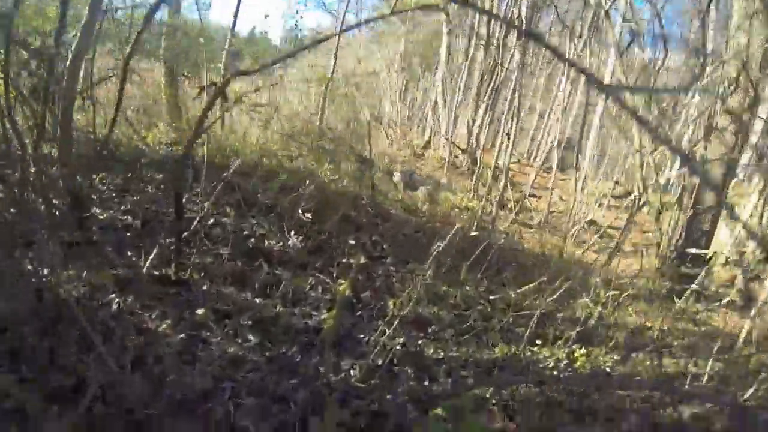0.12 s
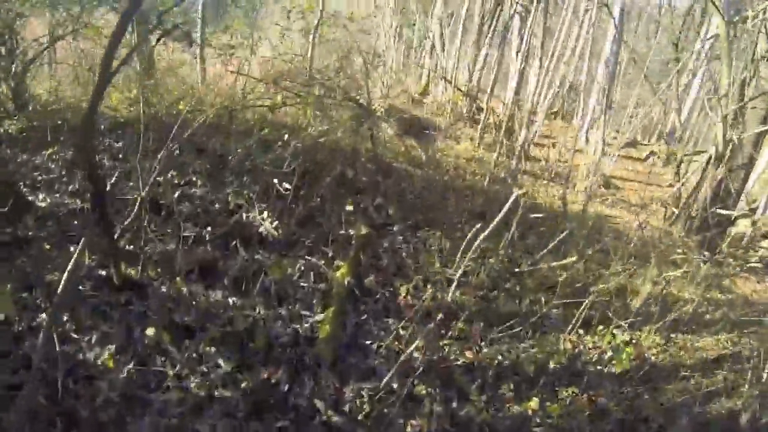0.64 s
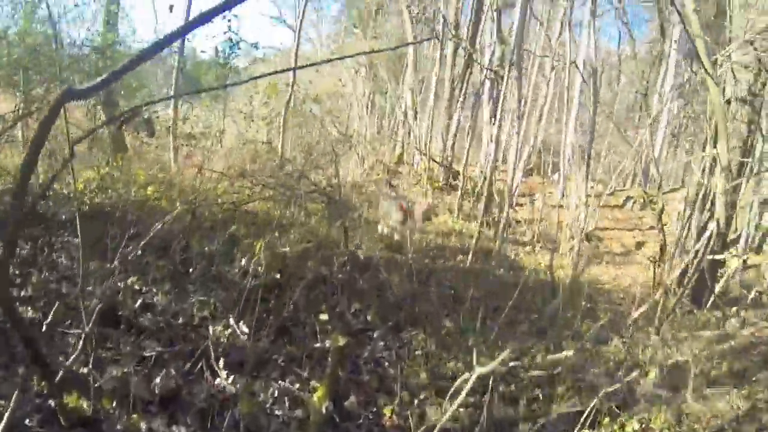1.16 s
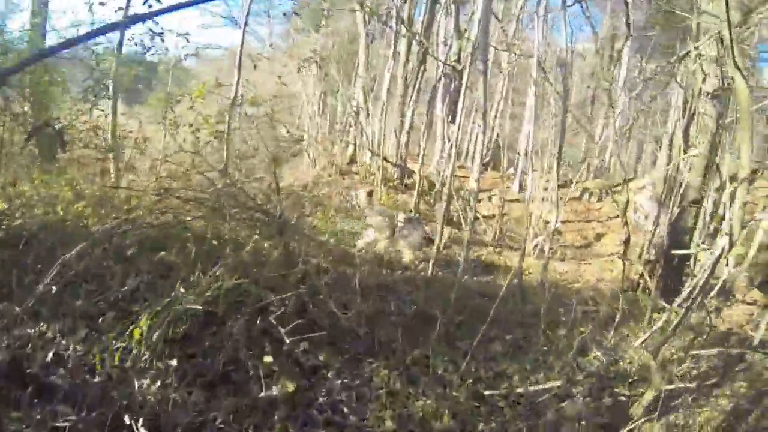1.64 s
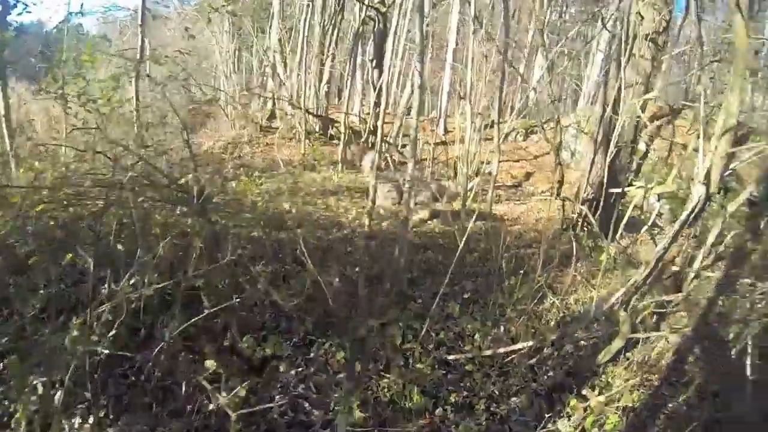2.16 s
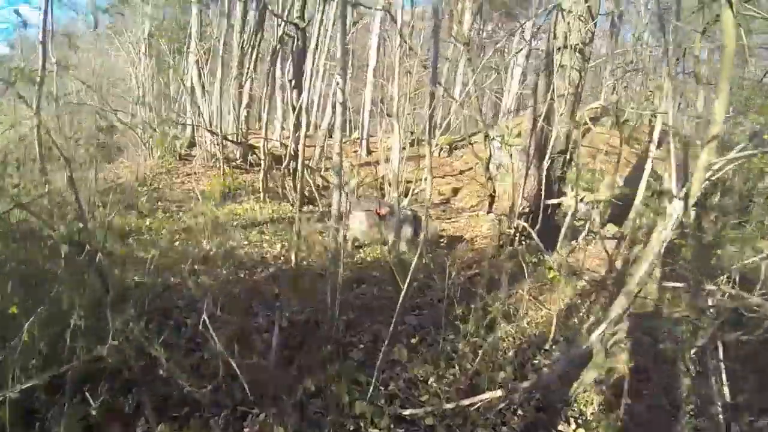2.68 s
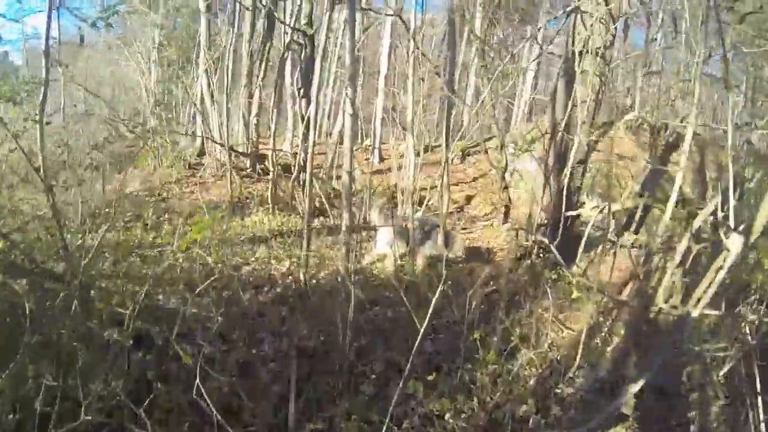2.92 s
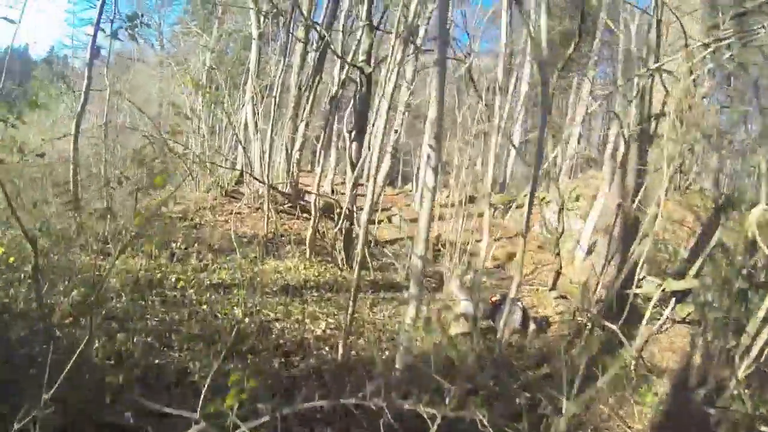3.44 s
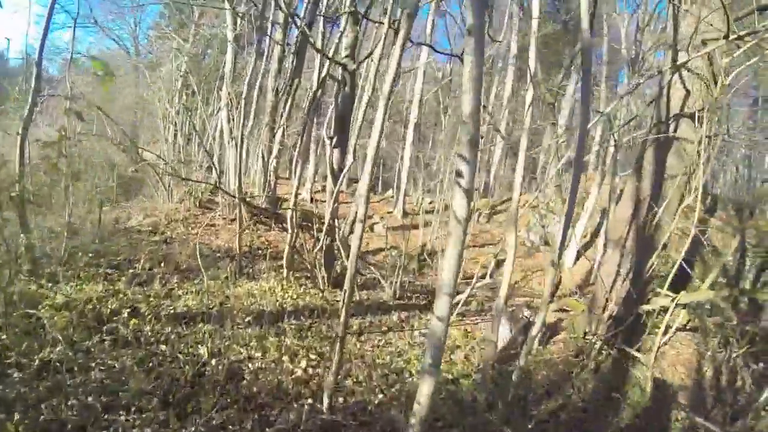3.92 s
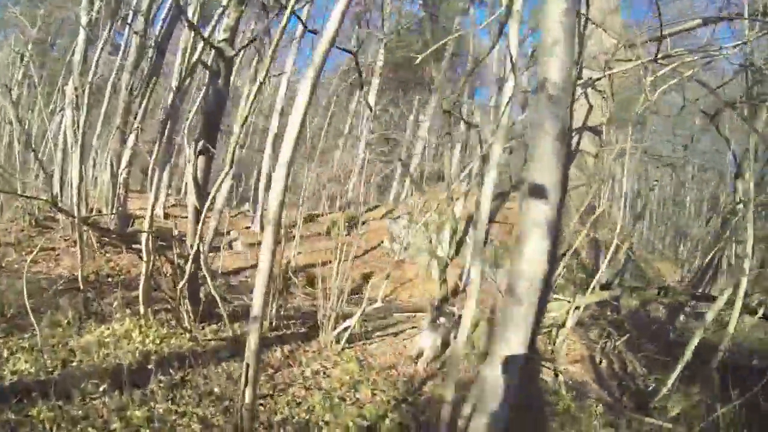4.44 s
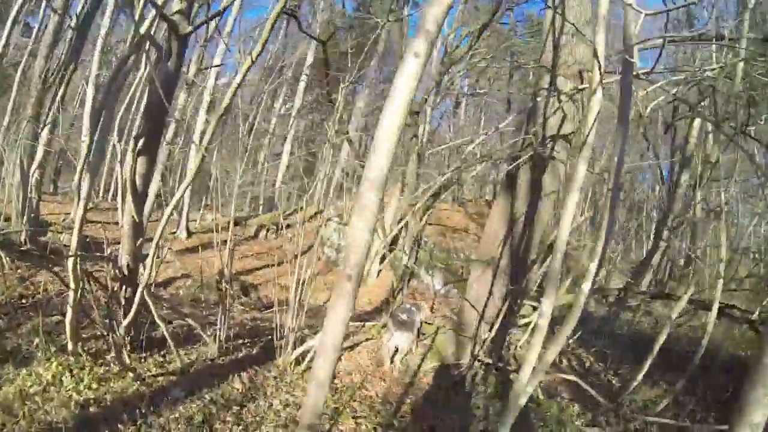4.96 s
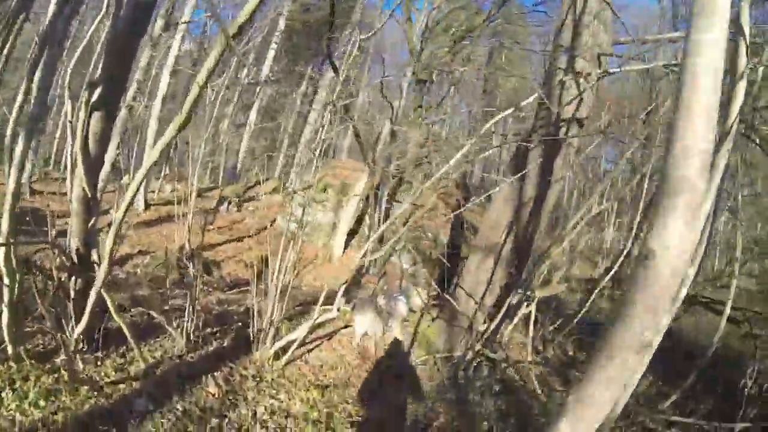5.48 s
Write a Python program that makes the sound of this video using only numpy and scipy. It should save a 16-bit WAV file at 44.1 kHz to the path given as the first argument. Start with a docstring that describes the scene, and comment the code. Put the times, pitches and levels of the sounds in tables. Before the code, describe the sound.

Deep muffled thuds, rubbing cloth, rustling dry leaves and sharp clicks as someone hurries through a wood with an encased body camera.

```python
"""Rubbing cloth and rustling leaves are heard first, over hiss, a high whine and a slow sway; then come
scuffs, twig snaps, ticks and deep thuds, as someone hurries through a wood with a camera in a closed plastic case.
Thuds are short swings of the case on its mount; rubs and ticks are grains and impulses that ring its
hollow resonances; leaves and snaps are shaped noise; near the end two sudden jumps drain away."""
import sys
import numpy as np
from scipy import signal
from scipy.fft import rfft, irfft, next_fast_len
from scipy.io import wavfile
from scipy.ndimage import uniform_filter1d, map_coordinates

SR = 44100
rng = np.random.default_rng(int(sys.argv[2]) if len(sys.argv) > 2 else 0)


def transcribe(u):
    """Save the signal u as a 16-bit wav file named by the first command-line argument.

    u: samples, shape (n,) or (channels, n), limited to [-1, 1]; the rate is SR.
    q: integer samples, one column per channel.
    """
    v = np.clip(np.atleast_2d(u).T, -1, 1)
    q = np.round(v * 32767).astype(np.int16)
    wavfile.write(sys.argv[1], SR, q)


def gain_from_db(level_db):
    """Convert decibel levels to linear amplitude factors (20 dB per decade)."""
    decades = np.asarray(level_db, float) / 20
    return 10 ** decades


N = 246519  # length [samples]

# Spectra of noise layers, scaled to rms 1 or by an envelope: (frequency [Hz], relative level [dB])
HISS_SPECTRUM = [(53, -21.5), (90, 2.5), (114, -8), (161, -12), (652, -15), (845, -22), (1000, -41.5),
                 (1140, -29.5), (1650, -1), (2230, -50.5), (3210, -22), (4070, -33), (10300, -29.5),
                 (12700, -37.5), (15500, -46)]
WHINE_SPECTRUM = [(9940, -29), (10000, -3), (10085, -2), (10140, -30.5)]
SWAY_SPECTRUM = [(7.1, -54.5), (12, 0), (27, -4), (43, -4), (56, -14), (75, -27.5), (96, -39), (130, -45),
                 (170, -69.5), (290, -120)]
DRAG_SPECTRUM = [(60, -31.5), (110, 1), (190, -2.5), (300, -4), (390, -4.5), (520, -8.5), (700, -11),
                 (1100, -19), (1500, -74.5)]
LID_SPECTRUM = [(600, -34.5), (790, -3), (870, -1.5), (950, -8), (1150, -45.5)]
LEAF_SPECTRUM = [(1500, -46), (2400, -3), (2720, -2.5), (3110, 1), (3500, 0.5), (3850, -9), (4330, -11),
                 (4750, -7.5), (5150, -9), (5700, -11), (7000, -14), (10300, -25.5), (13500, -27.5),
                 (15500, -50.5)]
# Hollow resonances of the case: (centre [Hz], width [Hz], level [dB])
CASE_RESONANCES = [(1528, 280, 7.5), (1800, 1160, -3), (3150, 500, -8.5), (5230, 200, -39)]
# How hard the clothes work against the shell: (time [s], level [dB])
CLOTH_EFFORT = [(0.0, -55.5), (0.43, -53), (0.9, -53.5), (1.09, -57.5), (1.29, -55), (1.43, -55),
                (1.59, -62), (1.71, -57.5), (1.99, -54.5), (2.32, -62.5), (2.49, -62.5), (2.71, -57.5),
                (3.14, -62), (3.32, -60), (3.69, -62), (4.09, -58.5), (4.28, -60.5), (4.48, -46),
                (4.64, -56.5), (4.86, -60.5), (5.14, -59), (5.59, -61.5)]
# Scuffs of cloth: (middle [s], level [dB], drag re level [dB], lid re level [dB], length [ms])
CLOTH_SCUFFS = [(0.038, -49, -2, -6.5, 26), (0.245, -58, -11, 0, 27), (.472, -45.5, -10, -12, 52),
                (0.498, -42.5, -21, -11, 34), (0.553, -41, -7.5, -10, 28), (0.575, -58, 7, 2, 20),
                (.735, -53, -18, -10, 79), (.79, -54, -23, -14, 36), (.92, -59, -8, 3.5, 20),
                (1.446, -49.5, -12, -4.5, 35), (1.502, -52, -3, 0.5, 33), (1.75, -61, -13, 2, 31),
                (1.863, -46, -10.5, -5, 21), (1.901, -38, -28, -11, 24), (1.944, -52, -20, -2, 16),
                (1.985, -51.5, -10, -4, 27), (2.116, -46.5, -9.5, -11, 25), (2.163, -45, -9, -6, 34),
                (2.731, -50, -8.5, -17, 30), (2.837, -52.5, -10, -4, 33), (2.867, -48, -7.5, -8.5, 32),
                (2.906, -51, -8.5, -9.5, 36), (3.439, -55, -17, -3.5, 29), (3.517, -52.5, -5, -7, 20),
                (3.86, -61.5, -9, -5, 40), (3.977, -51.5, -0.5, -8, 26), (4.015, -52, -24, -26, 65),
                (4.4, -55.5, -20, -18, 50), (4.493, -49, -14, -2, 22), (4.53, -45.5, -10, -7, 16),
                (4.615, -52.5, -42, -30, 72), (4.748, -51.5, -32, -29, 48), (4.82, -54, -30, -17, 57),
                (5.149, -46, -8.5, -6, 25), (5.212, -50.5, -8, -9.5, 18)]
# Rustle, set by how deep the leaves lie underfoot: (time [s], level [dB])
LEAF_LITTER = [(0.0, -63), (0.34, -57), (0.53, -62.5), (0.72, -60), (0.9, -63.5), (1.1, -63.5), (1.8, -62),
               (2.4, -67.5), (2.83, -63), (2.97, -69), (3.75, -66), (3.98, -59.5), (4.27, -66),
               (4.48, -57.5), (4.84, -67.5), (5.59, -64.5)]
# Twig and leaf snaps: (time [s], level [dB], thin top re level [dB])
TWIG_SNAPS = [(0.0564, -41.5, -4), (0.1036, -36, -29), (0.3054, -32.5, -26), (0.3935, -54, 8.5),
              (1.047, -45, -33), (1.1158, -56, 2), (2.0416, -51, 1), (2.0777, -52, -19), (2.265, -49, -30),
              (2.515, -49.5, -3), (2.734, -56, 2), (2.954, -49, -20), (2.974, -47.5, -12),
              (2.9905, -51, -16), (3.424, -51, -32), (3.669, -49, -2), (3.8226, -50, -8), (3.845, -52, -1),
              (4.18, -63, -24), (4.354, -26, 1), (4.369, -49, -17), (4.4563, -55, -6), (4.479, -44, -32),
              (4.534, -46, -12), (4.651, -48, -19), (5.4943, -49.5, -6)]
# Ticks on the shell: (time [s], level [dB], dull part re level [dB])
SHELL_TICKS = [(0.057, -32, -40), (0.106, -26.5, -38), (0.164, -33, -33), (0.228, -43, -6),
               (0.306, -31.5, -27), (0.397, -37.5, -21), (0.495, -30, -19), (0.557, -32.5, -7.5),
               (2.043, -37.5, -9), (2.15, -50, -30), (2.263, -37, -25), (2.861, -39, -9), (2.877, -55, -16),
               (2.99, -49, -22), (3.42, -35, -22), (3.441, -36, -32), (3.495, -34, -15),
               (3.514, -27.5, -21), (4.234, -38, -38), (4.354, -22.5, -29.5), (4.369, -34.5, -28),
               (4.496, -26.5, -16.5), (4.748, -36.5, -26), (5.308, -34, -15.5), (5.339, -35, -26)]
# Jolts of the mount: (time [s], level [dB], swing [Hz], length [ms], thrown down 1 or up -1)
MOUNT_JOLTS = [(0.181, -21, 33.7, 36, 1), (0.384, -11.5, 26.7, 67, 1), (0.46, -23.5, 24.2, 14, 1),
               (0.566, -8, 33.6, 34, 1), (1.093, -29, 34, 25, 1), (1.358, -19.5, 25.4, 55, 1),
               (1.501, -23, 28.8, 62, 1), (1.806, -19.5, 32.2, 32, 1), (1.893, -5.5, 27.4, 45, -1),
               (2.04, -18, 25.1, 92, 1), (2.165, -12, 28.1, 49, 1), (2.287, -17.5, 33.6, 46, 1),
               (2.473, -21.5, 31.7, 74, 1), (2.545, -22.5, 37.7, 63, 1), (2.73, -12.5, 33.3, 30, -1),
               (2.833, -24, 20.7, 71, -1), (3.435, -6, 27, 39.4, 1), (3.512, -19, 32.3, 47, 1),
               (3.972, -5.5, 29.5, 53, 1), (4.027, -14, 30.8, 21, 1), (4.086, -16, 42.3, 51, 1),
               (4.492, -3.5, 28.3, 59, 1), (4.593, -24, 30.4, 50, 1), (5.151, -0.5, 27.4, 57, 1),
               (5.256, -25.5, 30.4, 72, 1), (5.484, -26, 44, 48, 1)]
# Quick heel knocks around the hard jolts: (time [s], level [dB], length [ms])
HEEL_KNOCKS = [(1.877, -28, 9.6), (1.93, -30, 16), (2.036, -32.5, 14), (2.715, -31.5, 21), (3.415, -30, 18),
               (3.467, -29.5, 29), (3.946, -21, 24), (4.086, -37, 48), (4.464, -20, 31), (5.137, -23, 43),
               (5.185, -32, 11)]
# Jumps of the wave as the hardest jolt overloads the microphone: (time [s], size [full scale])
OVERLOAD_JUMPS = [(5.146, 0.26), (5.167, -0.16)]


def unit(x):
    """Normalization: x scaled to rms 1."""
    return x / np.sqrt(np.mean(x ** 2) + 1e-20)


def curve(rows):
    """Linear interpolation: (time, level) rows become one level per sample."""
    s, level = np.transpose(rows)
    return np.interp(np.arange(N) / SR, s, level)


def wobble(rate):
    """Slow random modulation: a smooth curve through rate random knots a second."""
    return map_coordinates(rng.standard_normal(N // 20), [np.arange(N) * rate / SR])


def filtered(x, response):
    """Linear filtering: the spectrum of x times a complex response of frequency."""
    m = next_fast_len(N + SR // 2)
    return irfft(rfft(x, m) * response(np.fft.rfftfreq(m, 1 / SR)), m)[:N]


def coloured(x, points):
    """Spectral shaping: x through a (Hz, dB) curve read on a log frequency axis."""
    f, db = np.transpose(points)
    return filtered(x, lambda hz: gain_from_db(np.interp(np.log(hz + 1), np.log(f + 1), db, -120, -120)))


def noise(points):
    """Stationary random sound: white noise shaped by a spectrum, at rms 1."""
    return unit(coloured(rng.standard_normal(N), points))


def hollow(x):
    """Cavity resonance: x drives second-order modes of the case, summed with alternating sign."""
    def modes(f):
        total = 0
        for k, (centre, width, db) in enumerate(CASE_RESONANCES):
            damping = 1j * f * width
            total = total + (-1) ** k * gain_from_db(db) * damping / (centre * centre - f * f + damping)
        return total
    return filtered(x, modes)


def soft(x, low_hz, high_hz):
    """Compliant contact: cloth passes a band and cuts below low_hz and above high_hz."""
    band = signal.butter(2, [low_hz, high_hz], "bandpass", fs=SR, output="sos")
    return signal.sosfilt(band, x)


def grainy(per_s, share):
    """Stick-slip roughness: noise plus sparse sharp grains that carry a share of the power."""
    grains = (rng.random(N) < per_s / SR) * rng.standard_normal(N)
    return np.sqrt(share) * unit(grains) + np.sqrt(1 - share) * rng.standard_normal(N)


def patchy(x, depth_db):
    """Uneven texture: random louder and softer patches over time and pitch."""
    z = signal.stft(x, nperseg=512)[2]
    field = uniform_filter1d(rng.standard_normal(z.shape), 10, axis=0)  # smooth in pitch
    field = uniform_filter1d(field, 8, axis=1)  # smooth in time
    return signal.istft(z * gain_from_db(depth_db * unit(field)), nperseg=512)[1][:N]


def driven(mean_db, gain):
    """Friction grows with effort: mean_db at mean effort, plus gain dB per dB of effort."""
    effort_db = curve(CLOTH_EFFORT)
    return mean_db + gain * (effort_db - effort_db.mean())


def strokes(times, db, ms):
    """Gliding contact: rounded, flat-topped envelopes centred on the times."""
    env = np.zeros(N + SR)
    t = (np.arange(SR // 5) - SR // 10) / SR
    for s, level, length in zip(times, db, ms):
        env[round(s * SR):][:len(t)] += gain_from_db(level) * np.exp(-np.abs(2000 * t / length) ** 2.8)
    return env[SR // 10:][:N]


def bursts(times, db, life_ms):
    """Impact and decay: each envelope rises at once and dies by 60 dB in its life."""
    env = np.zeros(N + SR)
    t = np.arange(SR // 5) / SR
    for s, level, life in zip(times, db, life_ms):
        rise = 1 - np.exp(-t / 0.00044)
        env[round(s * SR):][:len(t)] += gain_from_db(level - 60 * t / (life / 1000)) * rise
    return env[:N]


def swings(rows):
    """Damped mass on a springy mount: a few low cycles under a bell-shaped envelope."""
    out, t = np.zeros(N), np.arange(N) / SR
    for s, db, hz, ms, way in rows:
        near = slice(max(round((s - .2) * SR), 0), round((s + .2) * SR))
        u = t[near] - s
        # the swing starts quick and slows as the foot sinks in
        cycles = hz * (u - 0.77 * u * np.minimum(u, 0))
        # a faint overtone stands for the stiffer mount at full swing
        swing = np.cos(2 * np.pi * cycles) + 0.062 * np.cos(2 * np.pi * 1.933 * cycles)
        # the bell peaks 5 ms late and is ms wide at half height
        bell = np.exp(-4 * np.log(2) * (1000 * (u - .005) / ms) ** 2)
        out[near] -= np.sign(way) * gain_from_db(db) * bell * swing
    return out


def hiss():
    """Self-noise: the microphone's own steady random hiss."""
    return gain_from_db(-62) * noise(HISS_SPECTRUM)


def whine():
    """Narrow-band noise: a faint high whine near 10 kHz."""
    return gain_from_db(-90) * noise(WHINE_SPECTRUM)


def sway():
    """Random vibration: the case sways on its mount, more widely with effort."""
    level_db = driven(mean_db=-32.5, gain=0.3) + 0.5 * wobble(2.65) + 0.32 * wobble(3.7)
    return gain_from_db(level_db) * noise(SWAY_SPECTRUM)


def rubbing():
    """Stick-slip friction: cloth grains ring the case; its drag shakes the walls and sounds the lid."""
    s, db, drag_re_db, lid_re_db, ms = np.transpose(CLOTH_SCUFFS)
    stutter = wobble(45)  # shared by shell, drag and lid

    shell = gain_from_db(driven(mean_db=-59, gain=0.81) + 2.8 * stutter + 0.57 * wobble(130))
    scuff = strokes(s, db, ms) * gain_from_db(0.91 * wobble(110))
    drag = gain_from_db(driven(mean_db=-66.5, gain=0.36) + 3.0 * wobble(6.6) + 2.2 * stutter)
    drag = (drag + strokes(s, db + drag_re_db, ms)) * gain_from_db(0.8 * wobble(30))
    lid_db = driven(mean_db=-73, gain=0.51) + 2.2 * wobble(4.56) + 2.0 * wobble(31)
    lid = gain_from_db(lid_db + 2.5 * stutter)
    pressed_lid = strokes(s, db + lid_re_db + 1.5, ms)

    shell_grain = unit(hollow(grainy(per_s=900, share=0.33)))
    scuff_grain = unit(soft(hollow(grainy(per_s=1300, share=0.8)), low_hz=900, high_hz=3240))
    drag_grain = unit(coloured(grainy(per_s=170, share=0.21), DRAG_SPECTRUM))
    lid_grain = unit(coloured(grainy(per_s=180, share=0.8), LID_SPECTRUM))
    pressed_grain = unit(coloured(grainy(per_s=500, share=0.69), LID_SPECTRUM))
    return (shell * shell_grain + scuff * scuff_grain + drag * drag_grain
            + lid * lid_grain + pressed_lid * pressed_grain)


def leaves():
    """Many small fractures: dry leaves crackle underfoot, muffled by the case."""
    level_db = curve(LEAF_LITTER) + 1.47 * wobble(11) + 1.9 * wobble(60)
    crackle = patchy(grainy(per_s=1200, share=0.05), depth_db=2.0)
    return gain_from_db(level_db) * unit(coloured(crackle, LEAF_SPECTRUM))


def snaps():
    """Brittle fracture: a bright crack, its thin top, and a short scatter back from the trees."""
    s, db, top_db = np.transpose(TWIG_SNAPS)
    life = np.full(len(s), 30.8)  # ms
    body = noise(LEAF_SPECTRUM)
    top = noise([(4000, -12), (5500, 6.5), (8000, -0.5), (12000, -6.0), (15500, -15.5)])
    crack = bursts(s, db - 3.5, life / 3) + bursts(s, db - 13.5, life)
    crack_scatter = bursts(s + 0.013, db - 33, life + 200)
    thin = bursts(s, db + top_db - 7.5, life)
    thin_scatter = bursts(s + 0.014, db + top_db - 26.5, life + 110)
    return body * (crack + crack_scatter) + top * (thin + thin_scatter)


def ticks():
    """Impulse response: one firm contact and a dying chatter ring the case and thump its walls."""
    s, db, dull_db = np.transpose(SHELL_TICKS)
    life = np.full(len(s), 14.7)  # ms
    blows = np.sign(rng.standard_normal(N)) * bursts(s, db + 6.5, life)  # chatter
    blows[np.round(s * SR).astype(int)] += gain_from_db(db + 23)  # firm contact
    wall_noise = rng.standard_normal(N) * bursts(s, db + dull_db + 20.5, life + 25)
    thump = coloured(wall_noise, DRAG_SPECTRUM)
    return soft(hollow(blows), low_hz=1180, high_hz=3200) + thump


def jolts():
    """Transient excitation: each jolt throws the case on its mount in a deep thud."""
    return swings(MOUNT_JOLTS)


def heel_knocks():
    """Forced swing at a higher pitch: quick heel knocks shake the case downward."""
    return swings([(s, db, 64.7, ms, 1) for s, db, ms in HEEL_KNOCKS])  # 64.7 Hz


def overload():
    """Capacitive discharge: the wave jumps and the input coupling lets it drain away."""
    out = np.zeros(N + SR)
    t = np.arange(SR // 2) / SR
    for s, size in OVERLOAD_JUMPS:
        out[round(s * SR):][:len(t)] += size * (1 - np.exp(-t / 0.00047)) * np.exp(-t / 0.042)
    return out[:N]


def scene():
    """Superposition: all layers add at the microphone, in one channel."""
    background = hiss() + whine() + sway()
    contact = rubbing() + ticks()
    underfoot = leaves() + snaps()
    steps = jolts() + heel_knocks() + overload()
    return (background + contact + underfoot + steps)[None]


def low_pass(x):
    """Removes everything above the highest recorded frequency."""
    return signal.sosfilt(signal.butter(12, 15610, fs=SR, output="sos"), x)


def record(dry):
    """Storage: the finished mix is kept in one channel, with no further gain."""
    return low_pass(dry)


dry = scene()
out = record(dry)
transcribe(out)
```